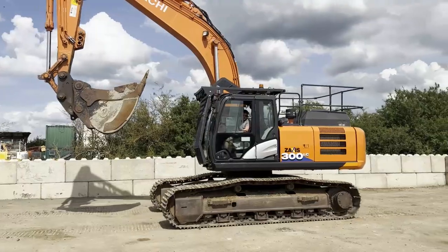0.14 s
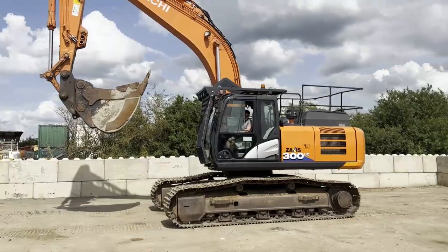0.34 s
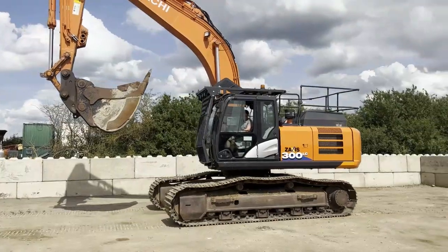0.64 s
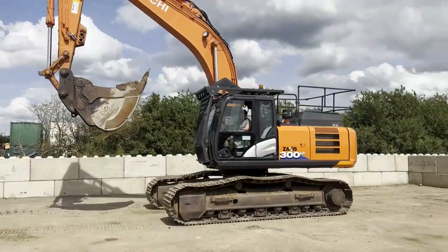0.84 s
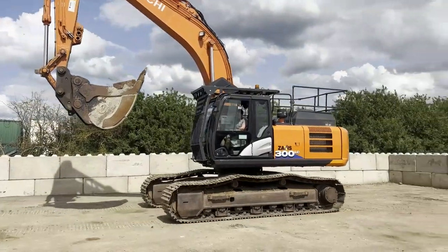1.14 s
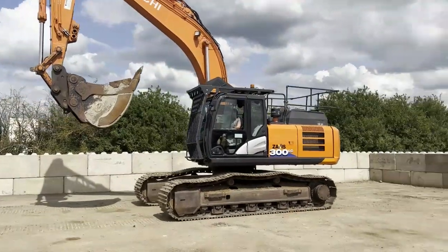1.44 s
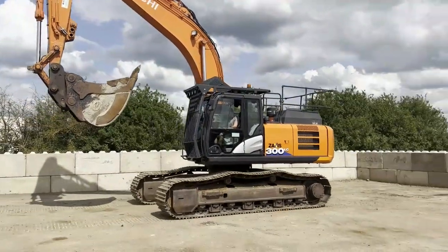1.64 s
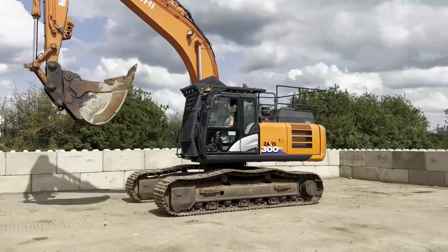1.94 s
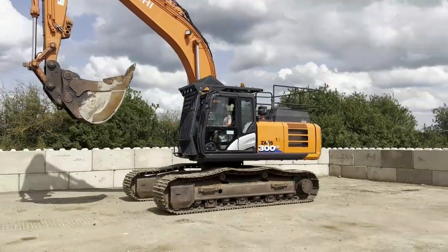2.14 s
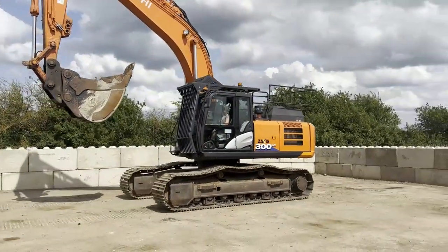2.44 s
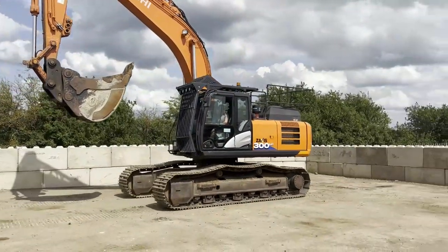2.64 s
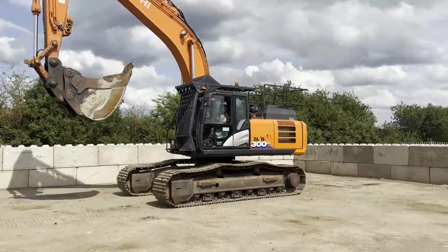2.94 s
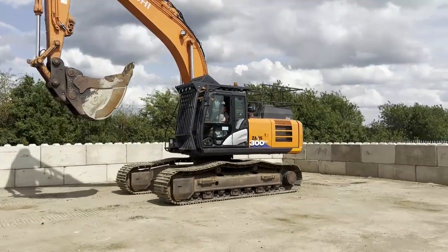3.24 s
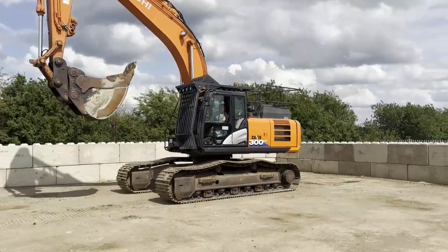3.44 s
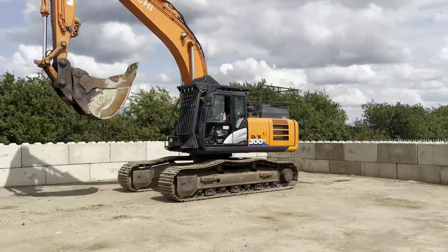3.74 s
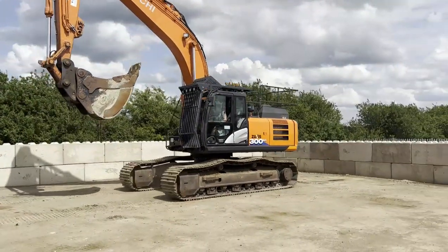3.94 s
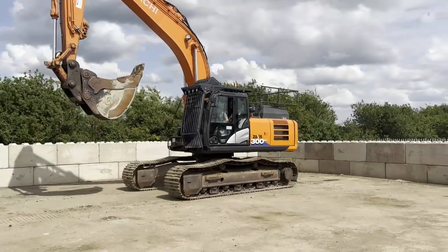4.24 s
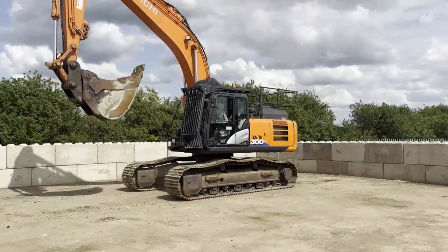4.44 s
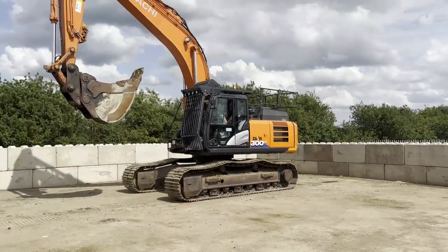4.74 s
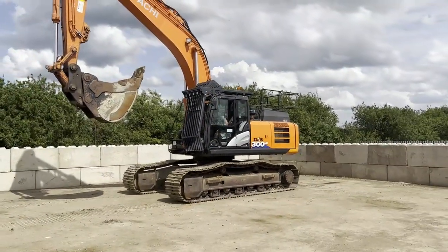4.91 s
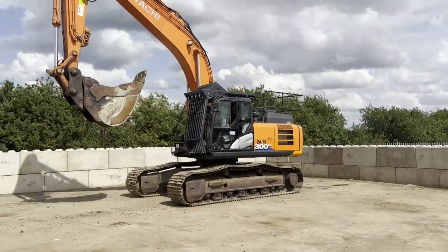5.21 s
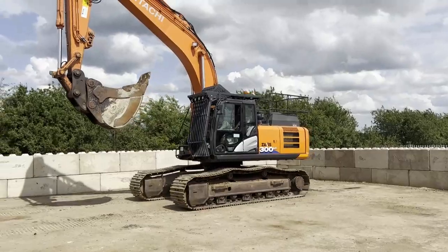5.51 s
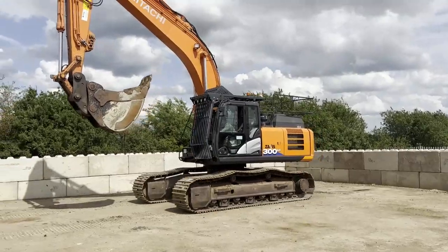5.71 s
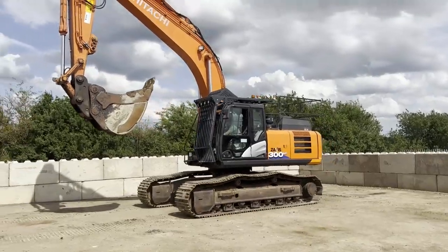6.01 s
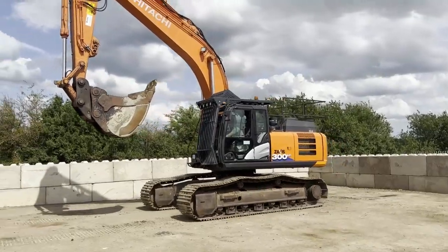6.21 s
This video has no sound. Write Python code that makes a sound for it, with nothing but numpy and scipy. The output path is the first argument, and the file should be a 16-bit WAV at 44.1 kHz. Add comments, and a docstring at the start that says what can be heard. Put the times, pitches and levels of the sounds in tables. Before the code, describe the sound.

An excavator is already turning on steel tracks in an open yard, heard in stereo from one fixed distance. Low rumble, ground shake and loose metallic rattle sit over a steady diesel with block and fan noise, whirring pump and thin turbo whistle. Around 0.15-0.25 s a dry pin squeaks shrilly. From about 0.4 to 4.2 s shoes clank at uneven pitches, rollers thump low, and bright links snap, ticking quickly and regularly around 0.7-2.7 s, then less evenly; short scrapes and faint grit fill the gaps. The whistle climbs over the first three seconds. At 4.2 s the tracks fall quiet; the engine runs on, its whistle sinking, and a tiny steel ping sounds near 4.85 s. From 5.3 s thumps and duller clanks return, rattle builds, and crisp snaps repeat from 5.8 s until the end at 6.4 s, still moving.

```python
"""Open yard, two microphone ports a few centimetres apart, one fixed distance throughout.
From the start an excavator turns on steel tracks: filtered noise gives its rumble and rattle, and noise with
sine tones its diesel, pump and turbo whistle. At once a dry pin squeaks in narrow noise bands, then links snap,
shoes clank and rollers thump as decaying modes and noise bursts. Past 4.2 s the tracks pause for a second, the
engine runs on and small steel pings; from about 5.3 s the machine moves on."""
import sys
import numpy as np
from scipy import signal
from scipy.fft import rfft, irfft, next_fast_len
from scipy.io import wavfile
from scipy.ndimage import uniform_filter1d, map_coordinates

SR = 44100
rng = np.random.default_rng(int(sys.argv[2]) if len(sys.argv) > 2 else 0)


def unload_audio(sound):
    """Save the sound as a 16-bit wav file, at the path given as the first command line argument."""
    columns = np.transpose(np.atleast_2d(sound))
    # keep every value between -1 and 1, then stretch to whole-number steps
    steps = np.round(np.clip(columns, -1, 1) * 32767)
    wavfile.write(sys.argv[1], SR, steps.astype(np.int16))


N = 280917

# Levels are relative: the functions trim each layer.
# Tracks in motion: [t/s, rumble level/dB, rollers over frame/dB, ground thud level/dB, rattle level/dB, grit level/dB]
TRACK_MOTION = [(0, -25, 1.5, -24, -29.5, -48), (.12, -21.5, 2.5, -30.5, -30, -47),
                (.45, -18.5, -2.5, -28, -28.5, -49.5), (.9, -20, 5.5, -27, -27, -48.5),
                (1.3, -20, -3, -33, -24.5, -45), (1.7, -19.5, 1.5, -27, -26, -45),
                (2.1, -18.5, -2, -28.5, -25, -44.5), (2.55, -16.5, 2, -22.5, -27, -46),
                (2.85, -17.5, 3, -29, -25.5, -44.5), (3.15, -17.5, 0.5, -21.5, -28.5, -45.5),
                (3.45, -18.5, 5, -31.5, -29, -48), (3.8, -17, 3, -34, -24, -48.5),
                (4.2, -19, -1.5, -24.5, -29, -48), (4.29, -22.5, 3.5, -32.5, -33.5, -52),
                (4.7, -35.5, 1, -37, -37, -55.5), (5.25, -30, -12, -35.5, -34, -52.5),
                (5.31, -24.5, 5, -29, -32.5, -52), (5.7, -20, 1, -39, -28, -50),
                (6.05, -21, 4, -35, -27, -46.5), (6.37, -19, 6.5, -30.5, -27.5, -42.5)]
# Ground thud spectrum: [f/Hz, density level/dB per Hz]
THUD_SPECTRUM = [(22, -47), (32, -26), (42, 9), (58, 11), (85, 15.5), (110, 10.5), (160, -44)]
# Track frame resonances: [f/Hz, width/Hz, level/dB]
FRAME_MODES = [(127.5, 29.6, -6.5), (158.8, 26.4, -2.5), (212.3, 14, 2.5), (252.6, 26.6, -5.5)]
# Roller resonances: [f/Hz, width/Hz, level/dB]
ROLLER_MODES = [(288.3, 29.3, -1.5), (342, 37.5, -3), (381.7, 25.3, -0.5), (463, 90, -8), (541.5, 106, -14)]
# Loose shoe rattle spectrum: [f/Hz, density level/dB per Hz]
RATTLE_SPECTRUM = [(250, -10), (440, 6.5), (600, 0), (800, -3.5), (1000, -1.5), (1350, -6), (1800, -12),
                   (2150, -14.5), (2500, -13), (3200, -22), (4200, -54)]
# Spectrum of grit grinding in the links: [f/Hz, density level/dB per Hz]
GRIT_SPECTRUM = [(2200, -27), (3200, 5), (3800, -2), (4400, -2), (5500, -6.5), (7000, -17.5), (8500, -8),
                 (10000, -25), (12500, -21), (14500, -35), (15700, -36)]
# Modes of a track shoe: [f/Hz, level/dB]
SHOE_MODES = [(580, -0.5), (690, -1.5), (780, -1), (920, -1.5), (1000, -2.5), (1150, -1.5), (1310, 0.5),
              (1600, -0.5), (1780, 1.5), (1930, -0.5), (2150, -4.5), (2460, -1.5), (3000, -6)]
# Engine effort: [t/s, level/dB]
ENGINE_LOAD = [(0, 4), (.6, 2.5), (2, 0), (4.2, -1.5), (4.6, -1.5), (5.3, -2.5), (6.37, 0)]
# Engine block and fan spectrum: [f/Hz, density level/dB per Hz]
BLOCK_SPECTRUM = [(25, -33), (45, -12), (70, -7.5), (150, 0.5), (300, -6.5), (550, -21), (1050, -21),
                  (1700, -23.5), (2150, -27.5), (2450, -24), (2700, -23), (3200, -36), (5500, -46),
                  (7500, -46.5), (11000, -48.5), (13000, -54), (15500, -61)]
# Steady engine tones: [f/Hz, mean peak level/dB]
ENGINE_TONES = [(123.8, -31), (602, -52), (663, -54), (1050, -55), (2588, -61)]
# Turbo whistle: [t/s, f/Hz, mean peak level/dB]
TURBO_WHISTLE = [(0, 9470, -65), (.35, 9420, -70), (.65, 9850, -63), (1.1, 10220, -65), (1.7, 10590, -62),
                 (2.1, 10780, -63), (2.6, 10870, -64), (3.4, 10970, -64), (4.1, 10980, -65),
                 (4.3, 10880, -64), (4.46, 11150, -66), (4.75, 10080, -69), (5, 9730, -70),
                 (5.35, 9470, -68), (5.65, 9400, -68), (5.9, 9850, -69), (6.12, 10000, -71),
                 (6.37, 9450, -72)]
# Hydraulic pump whirr: [t/s, centre f/Hz, mean level/dB]
PUMP_WHIRR = [(0, 2600, -51), (.9, 2640, -45), (1.5, 2570, -48), (3, 2560, -50), (4.2, 2580, -53.5),
              (5.3, 2580, -52), (5.6, 2520, -48), (6.37, 2600, -54)]
# A dry pin turns: [t/s, whistle level/dB, scrape level/dB]
PIN_SQUEAK = [(0.08, -68, -79), (0.1, -48, -60), (0.128, -39.5, -51), (0.143, -42, -39), (0.154, -46, -46),
              (0.167, -38, -48), (.179, -38, -49), (0.19, -33.5, -49), (0.204, -47, -61), (0.224, -49, -62),
              (0.232, -62, -67), (0.27, -64, -67)]
# Whistling resonances of the pin: [f/Hz, width/Hz, level/dB]
PIN_WHISTLE_MODES = [(6840, 40, -14), (7240, 16, 3), (7285, 16, 3), (8260, 30, -6), (9050, 150, -22),
                     (10950, 80, -13), (12950, 150, -19)]
# Scraping resonances of the pin: [f/Hz, width/Hz, level/dB]
PIN_SCRAPE_MODES = [(5280, 140, -2), (5520, 160, 0), (5770, 110, -2)]
# Links snapping: [t/s, level/dB, body over that level/dB, nominal t60/s]
LINK_SNAPS = [(0.158, -46, 6, 0.12), (0.3561, -41, 3, 0.16), (0.596, -50, -1, 0.14),
              (0.6714, -48, 14, 0.13), (0.7357, -39, 7, 0.14), (0.8001, -38.5, 6, 0.14),
              (0.8644, -45, 11, 0.14), (0.9293, -36, 7, 0.15), (0.9944, -46, 11, 0.14),
              (1.0565, -35.5, 6.5, 0.14), (1.1194, -44, 8, 0.14), (1.183, -32, 3, 0.19),
              (1.2494, -44, 8, 0.14), (1.3124, -30, 4.5, 0.14), (1.3744, -42, 7, 0.14),
              (1.4366, -38, 8, 0.16), (1.4994, -51, 8, 0.14), (1.5609, -49, -1, 0.14),
              (1.6217, -47, 10, 0.15), (1.6836, -37, 5, 0.14), (1.7335, -40, 3, 0.14),
              (1.8068, -33.5, 1, 0.15), (1.8682, -41, 6, 0.14), (1.931, -41, 4, 0.14),
              (1.9924, -44, 11, 0.14), (2.0557, -40, 6, 0.14), (2.1164, -50, 14, 0.14),
              (2.1794, -47, 10, 0.15), (2.2418, -46, 4, 0.14), (2.3042, -42, -1, 0.14),
              (2.4274, -43, 4, 0.14), (2.4897, -47, 6, 0.14), (2.5546, -38, 6, 0.17), (2.616, -47, 2, 0.13),
              (2.6788, -40, 3, 0.14), (2.7646, -39, -12, 0.091), (2.804, -45, 1, 0.14),
              (2.829, -41, -3, 0.14), (2.9297, -35, -6, 0.16), (2.9941, -38, 1, 0.14),
              (3.1782, -41, -13, 0.12), (3.193, -49, 4, 0.14), (3.2226, -37.5, -5, 0.12),
              (3.2395, -45, -1, 0.14), (3.3638, -45, -3, 0.14), (3.4271, -37, 0, 0.14),
              (3.488, -39, -4, 0.15), (3.6087, -42, -3, 0.14), (3.6496, -34, 0, 0.14),
              (3.6721, -39, -12, 0.14), (3.694, -34, -5, 0.14), (3.795, -39, 3, 0.14),
              (3.8561, -43, 5, 0.14), (3.919, -42, 0, 0.13), (3.9804, -37, -2, 0.14),
              (4.0407, -40.5, 1, 0.14), (4.1609, -38, -1, 0.18), (4.8479, -44, 0, 0.14),
              (5.8182, -36, -4, 0.14), (5.8875, -37, -2, 0.14), (5.9579, -41, -1, 0.14),
              (6.0274, -40, 1, 0.14), (6.0955, -39, -2, 0.14), (6.1644, -37, 1, 0.14),
              (6.2297, -33, -3, 0.14), (6.2976, -31.5, -3, 0.16)]
# Bright part of a snap: [f/Hz, density level/dB per Hz]
SNAP_TOP_SPECTRUM = [(6000, -33), (8000, -4.5), (10000, -9), (12000, -7.5), (13500, -3), (14600, -7),
                     (15700, -3)]
# Body of a snap: [f/Hz, density level/dB per Hz]
SNAP_BODY_SPECTRUM = [(1800, -40), (3000, 1.5), (4500, 0.5), (6000, -9.5), (8000, -10), (10500, -36)]
# Modes of a ringing link: [f/Hz, level/dB]
LINK_MODES = [(3010, 2), (3580, -3), (4100, -1), (4290, 3), (4560, -2), (4800, -3), (5300, 1), (5780, -1),
              (7300, -2), (8000, -4), (8600, -4)]
# Shoes landing: [t/s, level/dB, favoured f/Hz, edge over level/dB, scrape over level/dB]
SHOE_LANDINGS = [(0.162, -19, 800, -11.5, -6), (0.265, -23, 875, -12, -2), (0.466, -15, 1035, -18, -10),
                 (0.571, -10.5, 983, -28, -12), (0.638, -16, 1290, -14, -8), (0.651, -9, 775, -30, -12),
                 (0.757, -10, 920, -21, -20), (0.826, -13.5, 1224, -11.5, -7),
                 (0.846, -15.5, 1010, -17.5, -17), (0.891, -18.5, 930, -27, -15),
                 (0.963, -16, 810, -11.5, -8), (1.019, -16.5, 1860, -10, -5.5),
                 (1.036, -15, 1285, -17, -19), (1.132, -12.5, 656, -18, -11), (1.213, -19, 1950, -11, -17),
                 (1.221, -8.5, 1320, -19.5, -21), (1.338, -19.5, 629, -10, -2),
                 (1.389, -11.5, 1293, -14, -17), (1.394, -9.5, 1580, -19, -18),
                 (1.47, -21.5, 1310, -8, -19), (1.525, -19, 2484, -8, -13), (1.535, -13.5, 1330, -16, -17),
                 (1.553, -16.5, 1000, -22, -18), (1.569, -18.5, 1605, -8.5, -18),
                 (1.576, -12, 1144, -16, -15), (1.64, -20.5, 2500, -16, -19), (1.63, -16.5, 630, -17, -13),
                 (1.635, -13, 1314, -17, -14), (1.755, -11, 1127, -19.5, -9), (1.889, -17.5, 974, -15, -3),
                 (1.939, -13.5, 926, -22, -13), (1.954, -10, 1770, -14, -18),
                 (1.954, -14.5, 2480, -23, -18), (2.086, -22.5, 2490, -14, -21),
                 (2.059, -10, 670, -23, -22), (2.102, -14, 957, -22, -12), (2.128, -11, 1336, -11, -14),
                 (2.135, -15, 890, -29.5, -15), (2.284, -17, 995, -26, -5.5), (2.319, -9.5, 925, -13, -19),
                 (2.319, -11.5, 1924, -20, -23), (2.338, -25.5, 1930, -22, -18),
                 (2.445, -23.5, 837, -24, -4.5), (2.504, -16, 1353, -11, -7), (2.569, -18, 1303, -14, -17),
                 (2.693, -13, 575, -18, -10), (2.796, -26, 728, -21, -8), (2.881, -14.5, 1830, -16, -18),
                 (2.883, -13.5, 1280, -23, -15), (3.027, -15, 570, -20, -7), (3.064, -15.5, 1270, -11, -10),
                 (3.065, -12.5, 1623, -13.5, -13.5), (3.183, -19, 806, -26, -3.5),
                 (3.23, -20.5, 1400, -14.5, -0.5), (3.263, -17.5, 1660, -18.5, -11),
                 (3.368, -19, 680, -27, -10), (3.395, -22, 654, -15, -5), (3.455, -14.5, 1126, -16, -11.5),
                 (3.608, -13.5, 760, -19, -21), (3.641, -16.5, 913, -15, -7), (3.704, -23, 683, -36, -13),
                 (3.745, -23, 894, -35, -10), (3.798, -25, 1350, -18, -8), (3.813, -17, 1910, -7, -21),
                 (3.855, -21, 1970, -16, -12), (3.916, -28, 970, -24, -13), (3.958, -16.5, 1010, -17, -9),
                 (4.01, -17.5, 1850, -6, -20), (4.13, -20.5, 1076, -21, -7), (4.172, -22.5, 607, -18, -8.5),
                 (4.202, -21.5, 1080, -10, -11), (5.296, -23.5, 1580, -5.5, -6),
                 (5.352, -21.5, 1150, -20, -13), (5.414, -15, 975, -18.5, -13.5),
                 (5.547, -17, 594, -20, -17), (5.657, -16, 1025, -14, -7.5), (5.678, -17.5, 1146, -31, -9),
                 (5.709, -20, 930, -23, -11), (5.781, -19, 590, -27, -12), (5.821, -16.5, 663, -17, -14),
                 (5.88, -14.5, 586, -19.5, -14), (6.01, -17.5, 805, -22, -17),
                 (6.061, -18.5, 1056, -10.5, -14), (6.062, -25.5, 1880, -18, -16),
                 (6.09, -23, 954, -20, -7), (6.102, -13, 544, -35, -22), (6.192, -15.5, 597, -34, -13),
                 (6.237, -22.5, 1420, -24, -8), (6.262, -23, 1920, -13, -8), (6.3, -15, 558, -21, -13)]
# Bare impact of a shoe: [f/Hz, density level/dB per Hz]
STRIKE_SPECTRUM = [(450, -19), (800, -1.5), (1400, 10), (2000, 3), (3000, -13), (4500, -37)]
# Crack and scrape of a landing: [f/Hz, density level/dB per Hz]
CRACK_SPECTRUM = [(1200, -27), (2300, 12.0), (3500, -6.0), (6000, -14.5), (9000, -37)]
SCRAPE_SPECTRUM = [(500, 11), (900, 16.5), (1900, 9.0), (2800, -21), (4000, -56)]
# The weight drops onto a roller: [t/s, level/dB, f/Hz]
ROLLER_DROPS = [(0.372, -21.5, 131.5), (0.397, -15, 230), (0.579, -9, 316), (0.652, -10, 245),
                (0.69, -17, 154), (0.754, -10.5, 212), (0.758, -11, 139), (0.822, -8.5, 270),
                (0.852, -12.5, 148.5), (0.957, -8.5, 268.5), (1.002, -9.5, 225), (1.2, -13, 216),
                (1.339, -10.5, 311), (1.365, -3, 222), (1.557, -10.5, 252), (1.747, -8, 249),
                (1.802, -10, 219), (1.888, -7, 230), (1.917, -11.5, 75), (1.924, -7.5, 256),
                (1.93, -11, 45), (1.956, -8, 308), (2.01, -16.5, 290), (2.089, -10, 303),
                (2.031, -12, 120.5), (2.097, -12, 259), (2.156, -10.5, 209), (2.212, -7.5, 237),
                (2.277, -10.5, 258), (2.365, -8, 230), (2.368, -9, 133), (2.488, -11, 250),
                (2.579, -14, 289), (2.658, -10, 264), (2.696, -9.5, 293), (2.831, -7, 190),
                (2.838, -8, 380.4), (3.023, -13, 211), (3.114, -13, 65.4), (3.173, -17, 86.5),
                (3.19, -9.5, 277), (3.225, -9.5, 209), (3.325, -8.5, 178.5), (3.341, -8.5, 65.4),
                (3.454, -12, 312), (3.587, -13, 292.6), (3.705, -8, 208), (3.784, -6, 334),
                (3.806, -17, 392), (3.939, -9.5, 282), (3.961, -9.5, 217), (4.176, -9.5, 292),
                (5.283, -10.5, 377), (5.374, -12.5, 283), (5.565, -20, 307), (5.598, -15, 221),
                (5.634, -11, 308), (5.64, -11, 158.5), (5.887, -13.5, 326), (6.051, -10.5, 307),
                (6.214, -11, 156), (6.296, -9, 129.5)]
# A small steel part is struck: [t/s, level/dB, modes below 8 kHz over that level/dB]
STEEL_PINGS = [(4.848, -47, -20), (4.87, -66, 21)]
# Modes of the small steel part: [f/Hz, t60/s]
PING_MODES = [(5050, .018), (5600, 0.058), (6150, .018), (10930, 0.087), (13510, .08)]
# The two ports: [f/Hz, scattered over direct/dB, left lead/rad, left over right/dB]
PORT_RESPONSE = [(40, -12, .1, .2), (130, -13, 0, 1.6), (330, -15, -.25, 1), (650, -6.5, 0, .7),
                 (1350, -9, -.5, 0), (1900, -8, 0, .3), (2500, -8, .7, -1.5), (3300, -6, 1.5, 1.5),
                 (4300, -5, .6, 8), (5500, -4, 0, 7), (7000, -9, -.2, 1), (8400, -6, -1.5, .3),
                 (9550, -24, -2.85, 0), (10100, -36, -3.14, 0), (10600, -24, -3.4, 0), (11400, -7, -4.4, 0),
                 (12600, -26, -6.1, 0), (13400, -34, -6.28, 0), (14300, -26, -6.5, 0), (15000, -8, -7.6, 0),
                 (15700, -6, -8.6, 0)]

RUMBLE_TRIM_DB = -4.5  # frame and rollers share the rumble
SWELL_DB, SWELL_KNOTS_PER_S = 2.5, 14  # full random swell; each undercarriage layer takes a multiple
RATTLE_PATCHY_DB = 1.2
JINGLE_OVER_RATTLE_DB, JINGLES_PER_S, JINGLE_WIDTH_HZ = -9.5, 260, 45
FIRING_HZ = 61.9
PUMP_KNOTS_PER_S = 200  # sets how wide the whirr's band is
LINK_RING_OVER_BODY_DB, LINK_WIDTH_HZ, LINK_SCATTER_DB = -17.5, 100, 2.5
SHOE_T60_S, SHOE_HOLD_S, SHOE_RISE_S = 0.17, 0.011, 0.0019  # the ground soon chokes the ring
FAVOUR_DB_PER_OCTAVE, EDGE_LIFT_DB = 52, 0.5  # far modes ring only as hard as the edge bites
MODE_SCATTER_DB = 3  # where the blow lands changes each mode
STRIKE_OVER_EDGE_DB, STRIKE_T60_S = 3, 0.025
THUMP_T60_S, THUMP_RISE_S = 0.2, 0.0094
TOP_HZ = 15770  # nothing is kept above this


def amp(db):
    """Amplitude of a level in dB."""
    return 10 ** (np.asarray(db) / 20)


def unit(x):
    """x scaled to rms 1 over all its rows."""
    return x / np.sqrt(np.mean(x ** 2) + 1e-20)


def along(points, hz):
    """One array for each column of (f/Hz, value, ..) rows, read on a log axis."""
    f, *columns = np.transpose(points)
    return [np.interp(np.log(hz + 1), np.log(f + 1), column) for column in columns]


def curves(rows):
    """One value per sample for each column after the time."""
    s, *columns = np.transpose(rows)
    return [np.interp(np.arange(N) / SR, s, column) for column in columns]


def wobble(rate):
    """A smooth random curve, rate knots a second."""
    knots = rng.standard_normal(int(N * rate / SR) + 4)
    return map_coordinates(knots, [np.arange(N) * rate / SR])


def filtered(x, response):
    """x passed through a complex response of frequency."""
    m = next_fast_len(N + SR // 2)
    spectrum = rfft(x, m) * response(np.fft.rfftfreq(m, 1 / SR))
    return irfft(spectrum, m)[..., :N]


def resonances(modes):
    """The summed response of (f/Hz, width/Hz, level/dB) modes, alternating in sign."""
    def response(f):
        total = 0
        for k, (centre, width, db) in enumerate(modes):
            damping = 1j * f * width
            total = total + (-1) ** k * amp(db) * damping / (centre * centre - f * f + damping)
        return total
    return response


def shaped(spectrum):
    """The gain of a (f/Hz, level/dB) spectrum."""
    return lambda hz: amp(along(spectrum, hz)[0])


def noise(response, patchy_db=0):
    """Direct and scattered noise of rms 1, with shared time-frequency patches of random gain."""
    z = signal.stft(rng.standard_normal((2, N)), nperseg=512)[2]
    field = uniform_filter1d(rng.standard_normal(z.shape[1:]), size=4, axis=0)
    field = uniform_filter1d(field, size=6, axis=1)
    pair = signal.istft(z * amp(patchy_db * unit(field)), nperseg=512)[1][:, :N]
    return unit(filtered(pair, response))


def even(pair, span):
    """Noise with swells slower than span seconds levelled out, as from many small sources at once."""
    power = uniform_filter1d(pair ** 2, int(span * SR), axis=1)
    return unit(pair / np.sqrt(np.abs(power) + 0.034))


def decays(s, db, t60, rise):
    """The envelope of bursts whose powers add; rise is the time constant of the power in seconds."""
    power, t = np.zeros(N + SR), np.arange(SR // 3) / SR
    for start, top_db, fade in zip(s, db, t60 + 0 * s):
        burst = amp(2 * (top_db - 60 * t / max(fade, .01))) * (1 - np.exp(-t / rise))
        power[round(start * SR):][:len(t)] += burst
    return np.sqrt(power[:N])


def undercarriage():
    """Rollers shake ground and frame; loose shoes rattle and grit grinds in the links."""
    rumble_db, tilt_db, thud_db, rattle_db, grit_db = curves(TRACK_MOTION)
    rumble_db = rumble_db + RUMBLE_TRIM_DB

    def heave(depth):
        return unit(amp(depth * SWELL_DB * wobble(SWELL_KNOTS_PER_S)))

    knocks = np.zeros(N)  # small random knocks make the rattle grainy
    knocks[rng.integers(0, N, size=600)] = amp(0.86 * rng.standard_normal(600))
    grain = 1 + .4 * signal.lfilter([1], [1, -np.exp(-1 / (.006 * SR))], knocks)

    # thud and frame are stronger in the scattered row: the ground shakes all round the machine
    thud = amp(thud_db) * heave(1.18) * amp([[0], [2.5]]) * even(noise(shaped(THUD_SPECTRUM)), 0.046)
    frame = even(noise(resonances(FRAME_MODES)), 0.07)
    frame = amp(rumble_db - tilt_db / 2) * heave(0.63) * amp([[0], [2]]) * frame
    rollers = even(noise(resonances(ROLLER_MODES)), 0.053)
    rollers = amp(rumble_db + tilt_db / 2) * heave(0.7) * rollers
    rattle = unit(grain * noise(shaped(RATTLE_SPECTRUM), RATTLE_PATCHY_DB))
    rattle = unit(rattle + amp(JINGLE_OVER_RATTLE_DB) * jingle())
    rattle = amp(rattle_db) * heave(.35) * rattle
    grit = unit(grain ** 0.5 * noise(shaped(GRIT_SPECTRUM), RATTLE_PATCHY_DB))
    grit = amp(grit_db) * heave(.25) * grit
    return thud + frame + rollers + rattle + grit


def jingle():
    """Loose shoes touch many times, each touch faintly ringing one mode of a shoe."""
    count = int(JINGLES_PER_S * N / SR)
    hz, level_db = np.transpose(SHOE_MODES)[:, rng.integers(0, len(SHOE_MODES), size=count), None]
    draw, t = rng.standard_normal((2, count, 1)), np.arange(SR // 30) / SR
    size = amp(level_db - 4 * np.log2(hz / 600) + 2.5 * draw[0])
    rings = size * np.sin(2 * np.pi * hz * (1 + .03 * draw[1]) * t)
    rings = rings * np.exp(-np.pi * JINGLE_WIDTH_HZ * t) * (1 - np.exp(-t / SHOE_RISE_S))
    places = rng.integers(0, N, size=(2, count, 1)) + np.arange(len(t))
    return unit(np.array([np.bincount(at.ravel(), rings.ravel(), N + SR)[:N] for at in places]))


def engine():
    """Block and fan noise throbs with the firings under wavering tones, the pump and the turbo whistle."""
    t = np.arange(N) / SR
    throb = 1 + 0.064 * np.sin(2 * np.pi * FIRING_HZ * t + .5 * wobble(2.1))
    load_db, = curves(ENGINE_LOAD)
    block = amp(-26 + load_db) * throb * noise(shaped(BLOCK_SPECTRUM), patchy_db=1.0)
    tones = np.zeros(N)
    for hz, db in ENGINE_TONES:
        phase = 2 * np.pi * hz * t + hz ** .25 * .3 * wobble(9)
        tones += amp(db + 2.5 * wobble(7)) * np.sin(phase)
    turbo_hz, turbo_db = curves(TURBO_WHISTLE)
    flutter_db = 3 * wobble(7) + 2 * wobble(30)
    turbo_phase = 2 * np.pi * np.cumsum(turbo_hz) / SR + 1.1 * wobble(60)
    turbo = amp(turbo_db + flutter_db) * np.sin(turbo_phase)
    return block + pump() + (tones + turbo) * [[1], [.3]]  # tones are weaker in the scattered row


def pump():
    """A narrow, unsteady band of noise follows the pump's speed."""
    hz, level_db = curves(PUMP_WHIRR)
    phase = 2 * np.pi * np.cumsum(hz) / SR

    def band():
        return wobble(PUMP_KNOTS_PER_S) * np.cos(phase) + wobble(PUMP_KNOTS_PER_S) * np.sin(phase)

    return amp(level_db + 3.0 * wobble(9)) * unit(np.array([band(), band()]))


def pin_squeak():
    """A dry pin squeaks once as it slips: narrow noise bands whistle and scrape at changing levels."""
    t = np.arange(N) / SR
    inside = (t > PIN_SQUEAK[0][0]) & (t < PIN_SQUEAK[-1][0])
    whistle_db, scrape_db = curves(PIN_SQUEAK)
    whistle = amp(whistle_db) * even(noise(resonances(PIN_WHISTLE_MODES)), .03)
    scrape = amp(scrape_db) * even(noise(resonances(PIN_SCRAPE_MODES)), .03)
    return inside * (whistle + scrape)


def snaps():
    """Each link snaps with a sharp tick, a ringing body and a hissing tail that the yard walls draw out."""
    s, db, body_db, t60 = np.transpose(LINK_SNAPS)
    tick = decays(s, db - 8, .016, rise=.0001)
    hiss = decays(s, db - 10.0, t60, rise=.0002)
    tail = decays(s, db - 22.5, 1.8 * t60, rise=.004)
    top = (hiss + tail + tick) * even(noise(shaped(SNAP_TOP_SPECTRUM)), .0015)
    body = decays(s, db + body_db - 5.0, 2.04 * t60, rise=0.0049)
    body = body * noise(shaped(SNAP_BODY_SPECTRUM), patchy_db=2.5)
    ring = link_rings(s, db + body_db + LINK_RING_OVER_BODY_DB, np.maximum(t60, .02))
    return ring + top + body


def link_rings(s, db, t60):
    """Every snap rings the link's modes anew, each at its own strength and wavering as it fades."""
    out, t = np.zeros((2, N + SR)), np.arange(SR // 6) / SR
    hz, level_db = np.transpose(LINK_MODES)[:, :, None]
    step = np.sqrt(2 * np.pi * LINK_WIDTH_HZ / SR)  # a random walk of phase widens each mode
    for start, top_db, fade in zip(s, db, t60):
        draw = rng.standard_normal((len(LINK_MODES), 2))
        drift = np.cumsum(rng.standard_normal((2, len(LINK_MODES), len(t))), axis=2) * step
        size = amp(top_db + level_db + LINK_SCATTER_DB * draw[:, :1] - 60 * t / fade)
        pitch_hz = hz * (1 + 0.0067 * draw[:, 1:])
        ring = (size * np.sin(2 * np.pi * pitch_hz * t + drift)).sum(axis=1)
        out[:, round(start * SR):][:, :len(t)] += ring
    return out[:, :N]


def clanks():
    """Each landing rings the shoe's modes near a favoured pitch, with a strike, a crack and a short scrape."""
    rings, t = np.zeros((2, N + SR)), np.arange(SR // 5) / SR
    hz, level_db = np.transpose(SHOE_MODES)
    fade = np.exp(-(t / SHOE_HOLD_S) ** 2) + amp(-9.5 - 60 * t / SHOE_T60_S)
    shape = (1 - np.exp(-t / SHOE_RISE_S)) * fade
    for s, db, favoured_hz, edge_db, _ in SHOE_LANDINGS:
        draw = rng.standard_normal((3, 2, len(SHOE_MODES), 1))
        away = np.abs(np.log2(hz / favoured_hz))  # octaves
        others = away > away.min()  # the nearest mode moves onto the favoured pitch
        share_db = np.maximum(FAVOUR_DB_PER_OCTAVE * (away.min() - away), edge_db + EDGE_LIFT_DB)
        pitch_hz = np.where(others, hz, favoured_hz)[:, None] * (1 + .006 * draw[1])
        size = amp((level_db + share_db)[:, None] + MODE_SCATTER_DB * draw[0] * others[:, None])
        ring = (size * np.sin(2 * np.pi * pitch_hz * t + 2 * draw[2])).sum(axis=1)
        rings[:, round(s * SR):][:, :len(t)] += amp(db - 8.5) * ring * shape

    s, db, _, edge_db, scrape_db = np.transpose(SHOE_LANDINGS)
    strike = decays(s, db + edge_db + STRIKE_OVER_EDGE_DB, STRIKE_T60_S, rise=0.00092)
    strike = strike * even(noise(shaped(STRIKE_SPECTRUM)), 0.0043)
    crack = decays(s, db + edge_db - 2.5, 0.045, rise=0.0008)
    crack = crack * even(noise(shaped(CRACK_SPECTRUM)), 0.0018)
    scrape = decays(s, db + scrape_db - 0.5, 0.26, rise=0.0024)
    scrape = scrape * noise(shaped(SCRAPE_SPECTRUM))
    return rings[:, :N] + strike + crack + scrape


def thumps():
    """Each drop of the weight onto a roller rings the heavy frame briefly at one low pitch."""
    out, t = np.zeros((2, N + SR)), np.arange(SR // 3) / SR
    rise = 1 - np.exp(-t / THUMP_RISE_S)
    for s, db, hz in ROLLER_DROPS:
        phase = 2 * np.pi * (hz * t + rng.random((2, 1)))
        ring = amp(db - 60 * t / THUMP_T60_S) * np.sin(phase) * rise
        out[:, round(s * SR):][:, :len(t)] += ring
    return out[:, :N]


def steel_pings():
    """A small struck steel part rings faintly as a few decaying sine modes."""
    out, t = np.zeros(N), np.arange(N) / SR
    for s, db, low_db in STEEL_PINGS:
        since = np.maximum(t - s, 0)
        for hz, t60 in PING_MODES:
            level_db = db + low_db * (hz < 8000) - 60 * since / t60
            out += amp(level_db) * np.sin(2 * np.pi * hz * since)
    return out


def scene():
    """Row 0 is the direct sound, row 1 the sound scattered by the yard."""
    return undercarriage() + engine() + pin_squeak() + snaps() + clanks() + thumps() + steel_pings()


def record(dry):
    """The ports share the direct sound, differ by the scattered one, and shift and shade it by frequency."""
    def port(side):
        def response(hz):
            scatter_db, lead, balance_db = along(PORT_RESPONSE, hz)
            turn = np.arctan(amp(scatter_db))
            gain = amp(side * balance_db / 2) * np.exp(side * .5j * lead)
            return gain * np.array([np.cos(turn), side * np.sin(turn)])
        return filtered(dry, response).sum(axis=0)

    pair = np.array([port(1.0), port(-0.97)])  # left, right
    pair = pair / (1 + np.abs(pair / .8) ** 5) ** (1 / 5)  # the loudest peaks are rounded off
    return filtered(pair, lambda hz: hz < TOP_HZ)


dry = scene()
out = record(dry)
unload_audio(out)
```